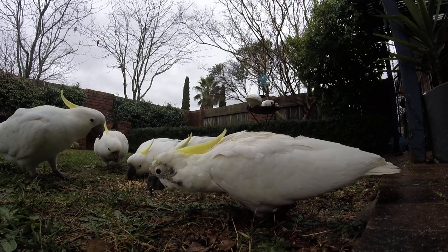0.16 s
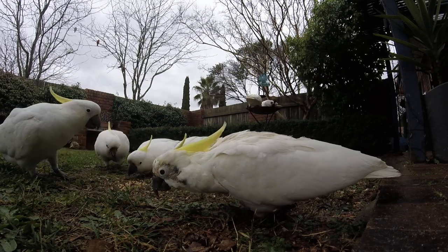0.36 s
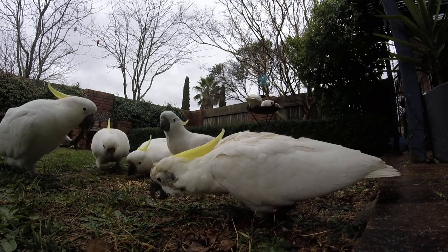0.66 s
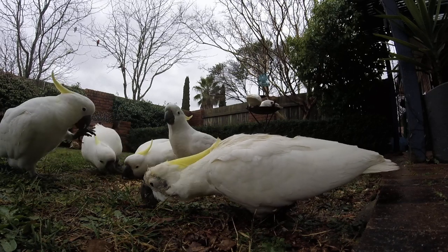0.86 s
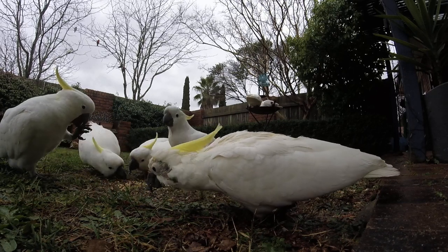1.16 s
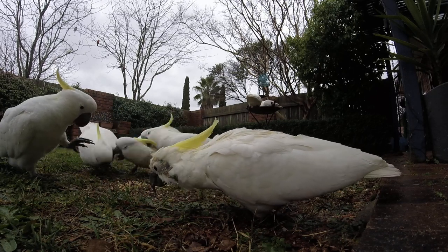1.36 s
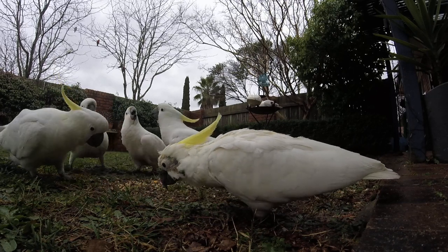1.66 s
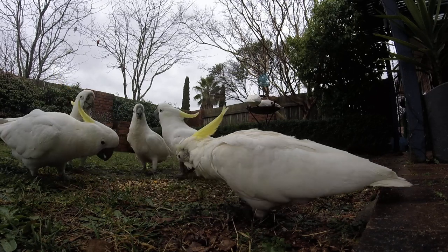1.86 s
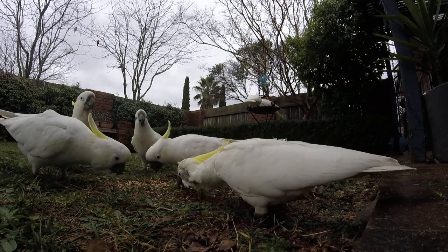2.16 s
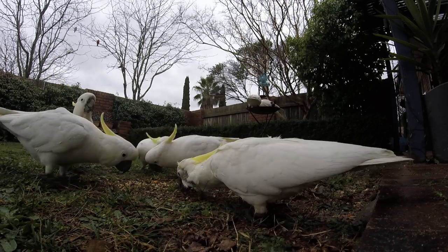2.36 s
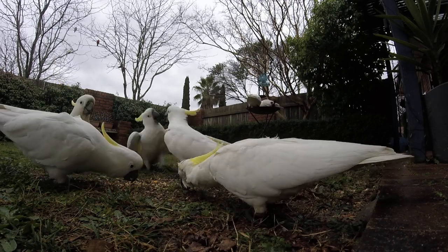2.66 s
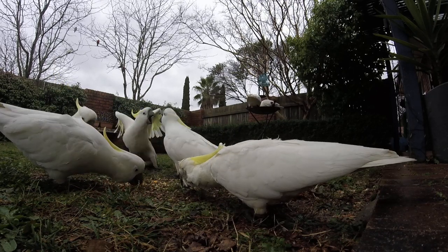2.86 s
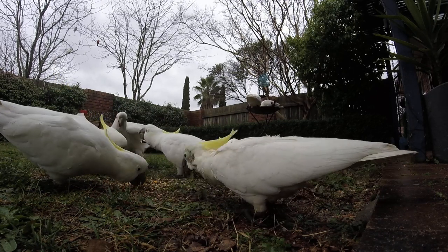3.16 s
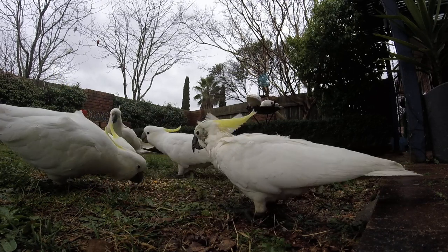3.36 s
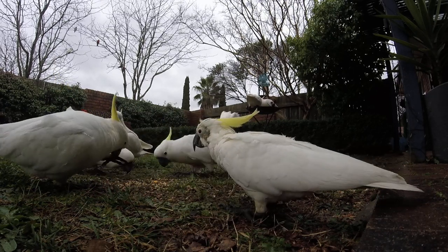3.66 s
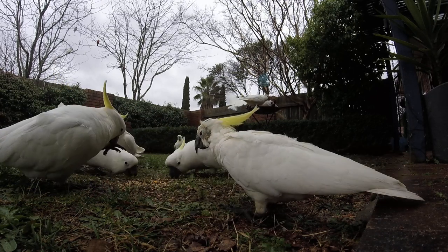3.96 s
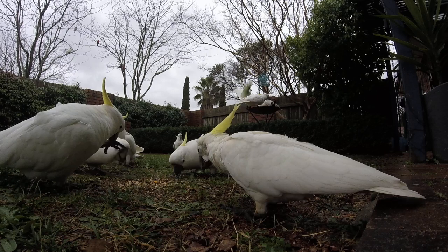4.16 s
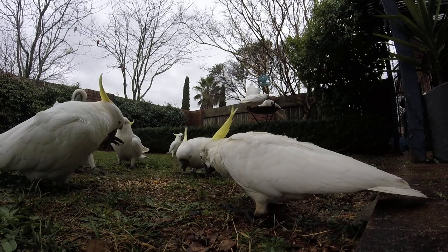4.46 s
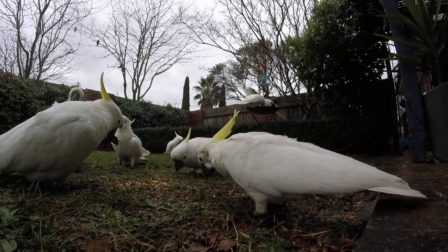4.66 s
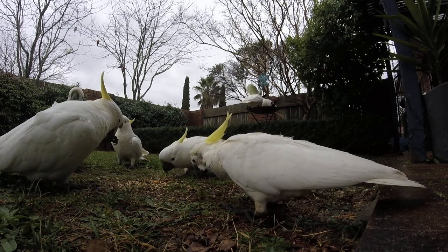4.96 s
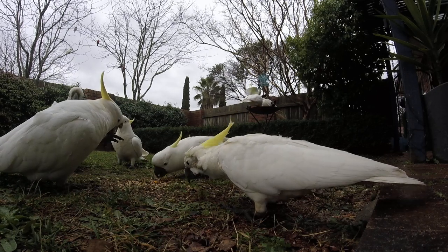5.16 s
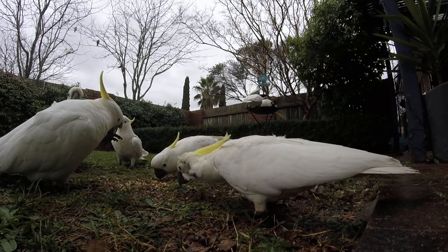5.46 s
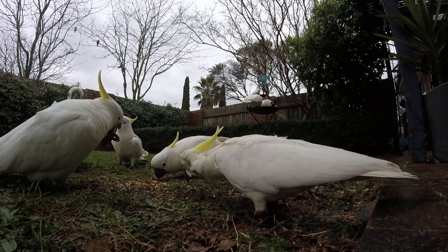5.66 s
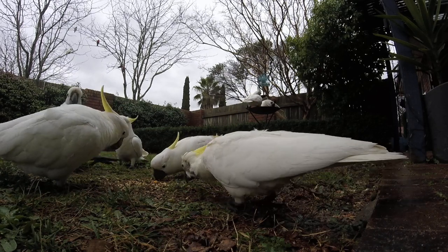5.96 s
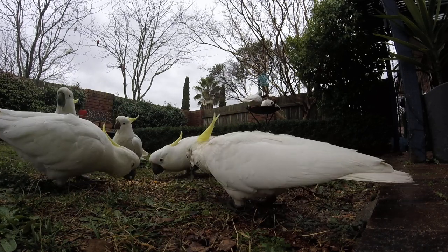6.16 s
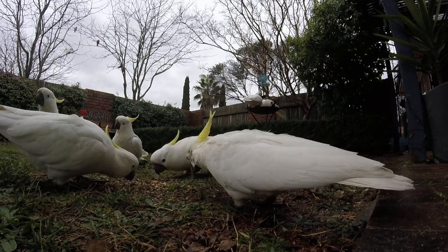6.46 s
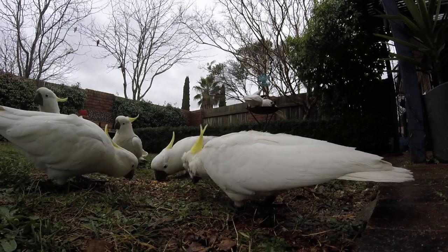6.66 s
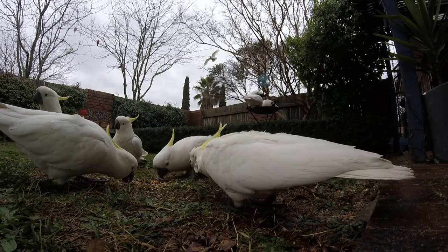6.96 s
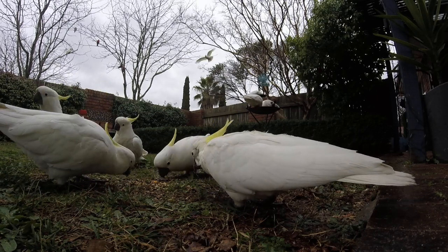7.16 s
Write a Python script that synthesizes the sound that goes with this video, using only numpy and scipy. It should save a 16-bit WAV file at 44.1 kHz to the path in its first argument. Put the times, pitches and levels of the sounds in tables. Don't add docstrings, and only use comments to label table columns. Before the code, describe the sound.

Quiet garden air with faint hiss; dry beak clicks and muffled footfalls nearby, a far bird rasping softly. A cockatoo suddenly screeches very loudly, harsh and buzzing, then twice more, shorter and rougher, with a short splashy echo from fences. Afterwards only sparse ticks, a thin distant chirp, then a denser cluster of seed cracks with grass rustle and one thud. Single channel, close outdoor pickup.

```python
import sys
import numpy as np
from scipy import signal
from scipy.fft import rfft, irfft, next_fast_len
from scipy.io import wavfile
from scipy.ndimage import uniform_filter1d, map_coordinates

SR = 44100
rng = np.random.default_rng(int(sys.argv[2]) if len(sys.argv) > 2 else 0)


def int16_out(signal):
    q = np.round(np.clip(np.atleast_2d(signal).T, -1, 1) * 32767)
    wavfile.write(sys.argv[1], SR, q.astype(np.int16))


def decibels_to_gain(level_db):
    exponent = np.asarray(level_db, float) / 20
    return 10 ** exponent


N = 323253

# (frequency [Hz], level per Hz [dB])
AIR_COLOUR = [(12, -32), (20, -4), (49, -2), (92, -2), (202, -4.5), (238, -5.5), (324, -6), (372, -8),
              (857, -12.5), (932, -13.5), (1580, -16), (1920, -17.5), (4550, -24), (13900, -39.5),
              (15500, -48.5)]
AIR_DB = -57

# (start [s], crest [s], end [s], first level [dB], crest level [dB])
FAR_RASP = (.2, .6, .74, -76, -70.5)
# (frequency [Hz], width [Hz], level [dB])
FAR_THROAT = [(1800, 270, -9.5), (2670, 320, -2), (3450, 400, -6)]
# (time [s], length [s], frequency [Hz], level [dB])
WHISTLES = [
    (4.203, .03, 3280, -70),
    (4.256, 0.055, 3300, -65.5),
    (4.312, .016, 3240, -65),
]

# (time [s], peak level [dB], frequency [Hz])
THUDS = [
    (0.759, -57, 168),
    (0.964, -58, 143),
    (2.009, -50.5, 174.5),
    (3.89, -69, 201),
    (5.95, -46.5, 178),
]
# (time [s], length [s], frequency [Hz], level [dB])
RUSTLES = [
    (5.066, .08, 6100, -75),
    (5.672, .03, 2600, -68),
    (5.872, .02, 2400, -70),
    (5.93, .04, 9500, -78),
    (5.945, .02, 3000, -70),
]

# (time [s], shell snap level [dB], hollow ring re snap [dB], dry husk re snap [dB])
CRACKS = [(0.5042, -52, 16, 0), (0.595, -44.5, -9, -5.5), (1.311, -70, 18, 6), (1.3739, -48, 13.5, -3),
          (1.8869, -47, 0.5, -15.5), (2.2807, -46, -10, -19), (3.7762, -66, 10, -9),
          (4.0489, -64.5, 12, -11.5), (4.0614, -60.5, -5.5, -12), (4.5708, -68, 9, -1),
          (4.6224, -60, 8, -11.5), (5.0611, -46.5, 4.5, -5), (5.6183, -43, -2, -8.5),
          (5.6297, -43.5, -7, -14), (5.6735, -52, -4, -15.5), (5.7853, -49, 0, -3.5), (5.874, -55, -5, -17),
          (5.9454, -52, 0, -9.5), (6.47, -53, 0, -12), (6.4812, -49, 12.5, -16), (6.8566, -42.5, -1, -18),
          (6.8692, -58, 9, -4)]
# (frequency [Hz], level [dB], time to die by 60 dB [s])
HOLLOW = [(1100, -14, .012), (1394, 0, .022), (1540, -7, .02), (1850, -8, .014)]
# (frequency [Hz], level [dB], time to die by 60 dB [s])
SHELL = [(2920, -1.5, .012), (3254, 3.5, .012), (4000, -4.5, .01)]
# (frequency [Hz], level [dB], time to die by 60 dB [s])
HUSK = [(6200, 0, .012), (6900, -3, .007), (7700, -3, .006), (8700, -5, .006)]

# (time [s], length [s], first pitch [Hz], last pitch [Hz], level [dB])
COOS = [
    (1.678, .024, 1420, 1420, -24),
    (1.67, .04, 420, 380, -55),
    (2.796, .027, 1400, 1380, -31),
    (2.79, .035, 420, 390, -58),
    (3.07, .04, 920, 830, -48),
]
# (time [s], peak level [dB], sharpness [dB])
SPITS = [(1.4587, -30.5, -6), (1.4785, -25.5, -5.5), (1.4985, -20.5, -5.5), (1.5644, -3, -18.5),
         (2.697, -18, -14), (2.7184, -6, -21), (2.953, -19, -21), (2.9896, -37, -5), (3.0004, -12, -15),
         (3.0117, -7.5, -17), (3.0384, -17, -10), (3.046, -9, -8.5), (3.0554, -15, -12.5),
         (3.1194, -32, -23)]

# (frequency [Hz], width [Hz], level [dB])
LONG_CALL = [
    [(399.5, 67, -39), (1003.4, 300, -9), (1484, 130, 5.5), (1654, 87, -30), (1963, 270, 4.5)],
    [(2198, 150, -2.5), (2666, 150, -4.5), (2910, 110, 3), (3280, 70, 2.5), (3540, 330, -13),
     (3940, 340, -8)],
    [(5000, 700, -18.5), (6220, 160, 3), (6885, 400, -5.5), (7380, 250, -1.5), (8300, 620, -15.5)],
]
# (frequency [Hz], width [Hz], level [dB])
SHORT_CALL = [
    [(393, 120, -29.5), (1083, 87, -11), (1433, 25.6, 7), (1840, 430, -14)],
    [(2560, 190, -5), (2770, 190, -3), (3180, 186, 3), (3540, 103, 3.5), (3930, 340, -7.5)],
    [(5760, 560, -8), (6150, 500, -2.5), (7300, 610, -8.5), (8540, 550, -24)],
]
# (frequency [Hz], width [Hz], level [dB])
HOARSE_CALL = [
    [(547, 130, -22), (864, 41, -8.5), (1414, 95, 1), (1840, 100, 2.5), (2170, 200, -12.5)],
    [(2533, 250, -2), (3002, 300, 1), (3270, 200, 2.5), (3750, 300, -2.5), (4367, 400, -9.5)],
    [(5277, 1600, -6.5), (6300, 630, 2), (7217, 880, -3.5), (8317, 1100, -12)],
]
TRACTS = [LONG_CALL, SHORT_CALL, HOARSE_CALL]
# (frequency [Hz], width [Hz], level [dB])
HISSES = [
    [(9300, 900, -1.5), (10200, 1400, -0.5), (11660, 730, -7.5), (12580, 500, -20), (13500, 600, -9),
     (14900, 560, -12.5)],
    [(9300, 1200, 0.5), (10390, 900, -1), (11600, 700, -9.5), (12600, 300, -35), (13600, 800, -26),
     (14900, 600, -24)],
    [(9340, 1000, -0.5), (10400, 900, -1.5), (11684, 700, -6), (12530, 300, -36), (13600, 800, -20),
     (14940, 600, -24)],
]
# (low edge [Hz], high edge [Hz])
BANDS = [
    (280, 2280),
    (1900, 4800),
    (4500, 9300),
    (8600, 16000),
]
# (burst life [s], leak between bursts [0-1])
RATTLES = [
    (.0055, .5),
    (.0028, .2),
    (.002, .08),
    (.0016, .035),
]
# (time [s], effort [dB], bill opening [0-1])
EFFORTS = [
    [(1.425, -59.5, 0.5), (1.447, -28.5, 0.13), (1.467, -19, 0), (1.501, -11.5, 0.13), (1.563, -15, 0.85),
     (1.661, -15.5, .45), (1.703, -42, 0.65)],
    [(2.678, -49, .8), (2.69, -42, 0.65), (2.698, -28, 0.34), (2.724, -18, 0.4), (2.772, -17, 0.41),
     (2.822, -46, .05)],
    [(2.928, -48, 0.6), (2.949, -32, .5), (2.96, -30.5, 0.5), (3.04, -24, 0.58), (3.046, -23, 0.72),
     (3.11, -29, 0.56), (3.128, -35, 0)],
]
# (bursts a second [Hz], their drift [Hz/s], windpipe re throat at full effort [dB],
# windpipe gain per dB of lost effort [dB/dB], hiss re throat with the bill shut [dB])
VOICES = [
    (146.6, -65, -6, 0.6234, -37),
    (143, 190, -9, 0.7463, -38.5),
    (107.3, 5, -2, 0.32, -39),
]
# (timing scatter [0-1], size scatter [dB], off-beat closure [dB])
ROUGHNESS = [
    (.2, 1.5, -10),
    (.2, 2, -13),
    (.5, 2.5, -4),
]
SAGS = [
    (.013, 0),
    (.06, 1.6),
    (.015, 0),
]
BEAK_SHUT_DB, BEAK_OPENS_DB, HISS_OPENS_DB = -27.5, 27.5, 15.5
HISS_FADES_DB_PER_S = -29.5

# (frequency [Hz], time to die by 60 dB [s], level [dB])
WALLS = [(500, 0.11, -1), (1320, 0.25, -3.5), (2300, .36, 3), (3120, 0.4, -3.5), (4106, .36, -2.5),
         (5200, 0.22, 1.5), (6200, 0.23, 0), (8000, 0.31, -9.5), (14000, 0.37, 2)]
MOVES = [0, 2.5, 2.9, 8]


def unit(x):
    return x / np.sqrt(np.mean(x ** 2) + 1e-20)


def along(points, hz):
    f, v = np.transpose(points)
    return np.interp(np.log(hz + 1), np.log(f + 1), v)


def filtered(x, response):
    size = next_fast_len(len(x) + 8192)
    spectrum = rfft(x, size) * response(np.fft.rfftfreq(size, 1 / SR))
    return irfft(spectrum, size)[:len(x)]


def band(x, order, edges):
    return signal.sosfilt(signal.butter(order, edges, "bandpass", fs=SR, output="sos"), x)


def resonant(x, modes, edges):
    def ring(hz):
        total = 0
        for k, (centre, width, db) in enumerate(modes):
            damping = 1j * hz * width
            total = total + (-1) ** k * decibels_to_gain(db) * damping / (centre ** 2 - hz ** 2 + damping)
        return total

    return band(filtered(x, ring), 4, edges)


def add_at(out, s, sound):
    out[round(s * SR):][:len(sound)] += sound


def air(patchy_db=1.0):
    z = signal.stft(rng.standard_normal(N + 512), nperseg=512)[2]
    patches = uniform_filter1d(rng.standard_normal(z.shape), 8, 0)
    patches = uniform_filter1d(patches, 20, 1)
    hiss = signal.istft(z * decibels_to_gain(patchy_db * unit(patches)), nperseg=512)[1][:N]
    return decibels_to_gain(AIR_DB) * unit(filtered(hiss, lambda hz: decibels_to_gain(along(AIR_COLOUR, hz))))


def far_birds():
    t = np.arange(N) / SR
    start, crest, end, first_db, crest_db = FAR_RASP
    swell_db = np.interp(t, [start, crest, end], [first_db, crest_db, first_db], -150, -150)
    out = decibels_to_gain(swell_db) * unit(resonant(rng.standard_normal(N), FAR_THROAT, (1400, 4200)))
    for s, length, hz, db in WHISTLES:
        swell = np.sin(np.pi * np.clip((t - s) / length, 0, 1)) ** 0.5
        out = out + decibels_to_gain(db) * swell * np.sin(2 * np.pi * hz * t)
    return out


def thuds():
    out, t = np.zeros(N + SR), np.arange(SR // 5) / SR
    for s, db, hz in THUDS:
        soft_start = 1 - np.exp(-t / 0.0052)
        add_at(out, s, decibels_to_gain(db + 8.0 - 60 * t / 0.13) * np.sin(2 * np.pi * hz * t) * soft_start)
    return out[:N]


def rustles():
    out = np.zeros(N)
    for s, length, hz, db in RUSTLES:
        u = np.arange(round(length * SR)) / round(length * SR)
        puff = resonant(rng.standard_normal(len(u)), [(hz, hz / 2, 0)], (hz * .6, hz * 1.34))
        add_at(out, s, decibels_to_gain(db) * np.sin(np.pi * np.sqrt(u)) * unit(puff))
    return out


def rung(modes, t):
    out = 0
    for hz, db, t60 in modes:
        fading = decibels_to_gain(db + rng.normal(0, 1.9) - 60 * t / t60)
        out = out + fading * np.sin(2 * np.pi * hz * rng.normal(1, 0.0059) * t)
    return out


def snap(edges, t):
    return band(decibels_to_gain(-60 * t / .009) * rng.standard_normal(len(t)), 3, edges)


def cracks():
    out, t = np.zeros(N + SR), np.arange(SR // 16) / SR
    for s, db, hollow_db, husk_db in CRACKS:
        shell = 0.4 * rung(SHELL, t) + 2.1 * snap((2300, 4500), t)
        husk = rung(HUSK, t) + 1.58 * snap((5600, 9500), t)
        ring = decibels_to_gain(hollow_db + 7.0) * rung(HOLLOW, t) + decibels_to_gain(4.5) * shell + decibels_to_gain(husk_db + 10.0) * husk
        add_at(out, s, decibels_to_gain(db) * ring * (1 - np.exp(-t / .0009)))
    return out[:N]


def coos():
    out = np.zeros(N)
    for s, length, first_hz, last_hz, db in COOS:
        u = np.arange(round(length * SR)) / round(length * SR)
        phase = 2 * np.pi * np.cumsum(first_hz + (last_hz - first_hz) * u) / SR
        add_at(out, s, decibels_to_gain(db) * np.sin(np.pi * u ** 1.46) ** 0.66 * np.sin(phase))
    return out


def spits():
    puffs, t = np.zeros((3, N)), np.arange(SR // 100) / SR
    for s, db, sharp_db in SPITS:
        beak_db = db + sharp_db + 14.5
        gains = decibels_to_gain([[db + 7.0], [beak_db], [beak_db + 1 - 20.5]])
        puffs[:, round(s * SR):][:, :len(t)] += gains * decibels_to_gain(-60 * t / 0.0028) * rng.standard_normal(len(t))
    groups = HOARSE_CALL[1:] + HISSES[2:]
    return sum(resonant(puff, group, edges) for puff, group, edges in zip(puffs, groups, BANDS[1:]))


def closures(rate, scatter, size_db, offbeat_db):
    cycles = 2 * np.cumsum(rate) / SR
    luck = np.clip(rng.standard_normal((160, 2)), -1.5, 1.5)[:int(cycles[-1]) + 1]
    beat = np.arange(len(luck))
    at = np.searchsorted(cycles, beat + np.clip(scatter * luck[:, 0], -.9, .9))
    strength = decibels_to_gain(size_db * luck[:, 1] + offbeat_db * (beat % 2))
    return np.bincount(np.clip(at, 0, len(rate) - 1), strength, len(rate))


def syrinx(slaps, rattle, life, leak, slap=3.5, filling=.07):
    t = np.arange(SR // 40) / SR
    burst = np.exp(-t / life) * (1 - np.exp(-t * SR / 10))
    gate = signal.fftconvolve(slaps, burst)[:len(slaps)]
    leaking = leak * np.clip(np.arange(len(slaps)) / SR / filling, .15, 1)
    return rattle * (gate + leaking) - slap * slaps


def wavering(x, modes, edges, shift=.013, pull=0, rate=30):
    knots = rng.standard_normal(40)
    restless = map_coordinates(knots, [np.arange(len(x)) * rate / SR]) * 1.1 / (1 + pull ** 2)
    share = .5 + .5 * np.tanh(restless + pull * np.linspace(1, -2.4, len(x)))
    short, long = [resonant(x, [(k * hz, width, db) for hz, width, db in modes], edges)
                   for k in (1 + shift, 1 - shift)]
    return unit(np.sqrt(share) * short + np.sqrt(1 - share) * long)


def screech(rows, voice, tract, top, rough, sag):
    rate, drift, pipe_db, lead, hiss_db = voice
    s, *cols = np.transpose(rows)
    t = np.arange(s[0], s[-1] + 0.004, 1 / SR)
    age = t - s[0]
    effort_db, gape = [np.interp(t, s, c) for c in cols]
    slaps = closures(rate + drift * age, *rough)
    spiky = decibels_to_gain(3.6 * rng.standard_normal(SR))
    rattle = unit(rng.standard_normal(SR) * spiky)[:len(t)]
    parts = zip(tract + [top], BANDS, RATTLES, [(), sag, (), ()])
    pipe, throat, beak, hiss = [wavering(syrinx(slaps, rattle, *burst), group, edges, *swing)
                                for group, edges, burst, swing in parts]
    low = decibels_to_gain(pipe_db + lead * (effort_db.max() - effort_db)) * pipe
    joins = np.cumprod([(-1) ** (len(group) + 1) for group in tract[1:]])
    beak = decibels_to_gain(BEAK_SHUT_DB + BEAK_OPENS_DB * gape) * beak
    hiss = decibels_to_gain(hiss_db + HISS_OPENS_DB * gape + HISS_FADES_DB_PER_S * age) * hiss
    voiced = throat - low + joins[0] * beak + joins[1] * hiss
    return s[0], np.clip((t[-1] - t) / 0.012, 0, 1) * decibels_to_gain(effort_db - 3.5) * voiced


def screeches():
    out = np.zeros(N + SR)
    for settings in zip(EFFORTS, VOICES, TRACTS, HISSES, ROUGHNESS, SAGS):
        add_at(out, *screech(*settings))
    return out[:N]


def garden(x, delay=.011):
    out = np.zeros(N)
    n = np.arange(N)
    for start, end in zip(MOVES, MOVES[1:]):
        hz, t, z = signal.stft(rng.standard_normal(SR // 2), SR, nperseg=256)
        t60, colour_db = [along([(row[0], row[k]) for row in WALLS], hz)[:, None] for k in (1, 2)]
        tail = signal.istft(z * decibels_to_gain(colour_db - 60 * t / t60), SR, nperseg=256)[1]
        heard = x * (n >= start * SR) * (n < end * SR)
        late = np.pad(heard, (round(delay * SR), 0))
        out = out + signal.fftconvolve(late, tail / np.linalg.norm(tail))[:N]
    return out


def scene():
    calls, notes, seeds = screeches() + spits(), coos(), cracks()
    echoes = garden(decibels_to_gain(-8) * calls + decibels_to_gain(-23) * notes + decibels_to_gain(-17) * seeds)
    return (calls + notes + seeds + echoes + thuds() + rustles() + far_birds() + air())[None]


def band_limit(x):
    return signal.sosfilt(signal.butter(12, 15700, fs=SR, output="sos"), x)


def record(dry):
    mix = filtered(dry[0], lambda hz: hz < 15260)[None]
    return band_limit(mix)


dry = scene()
out = record(dry)
int16_out(out)
```